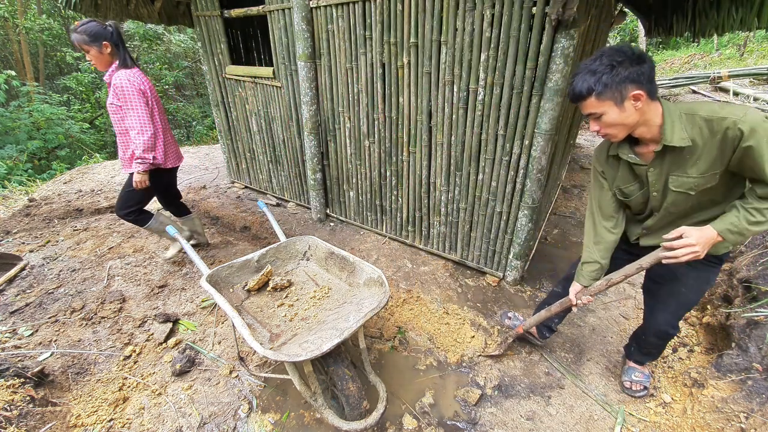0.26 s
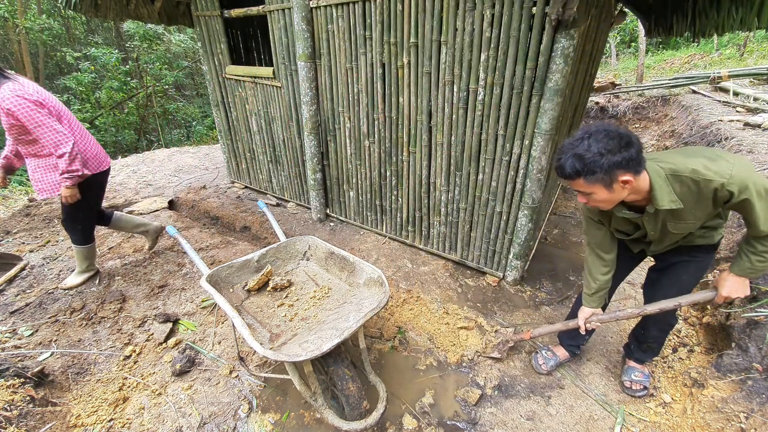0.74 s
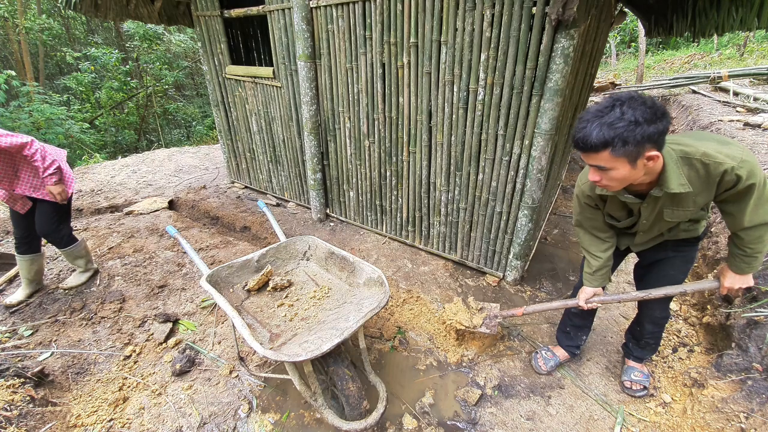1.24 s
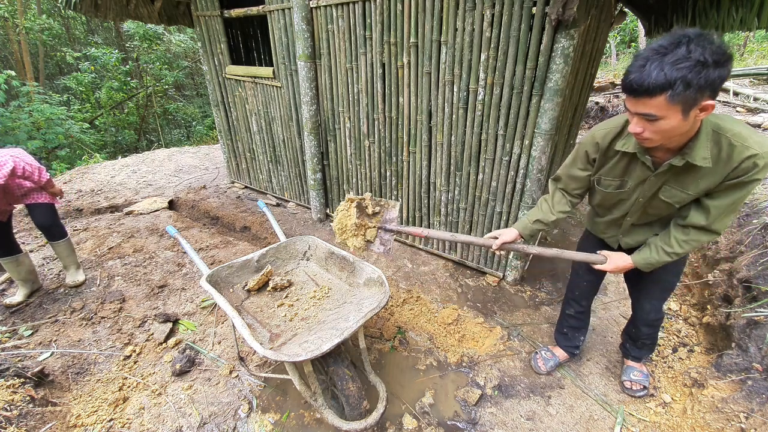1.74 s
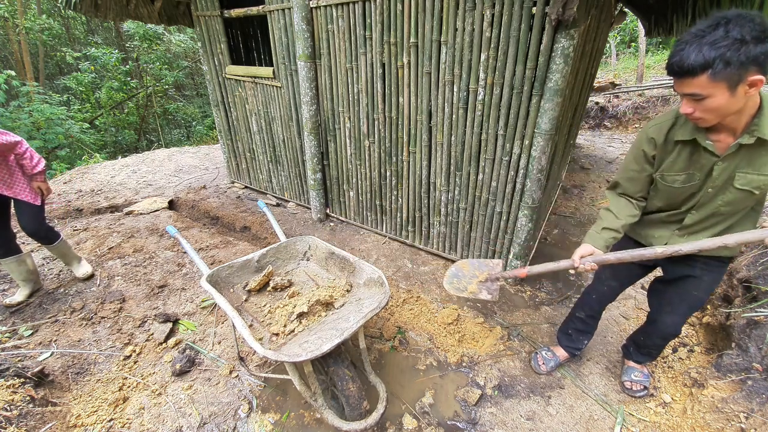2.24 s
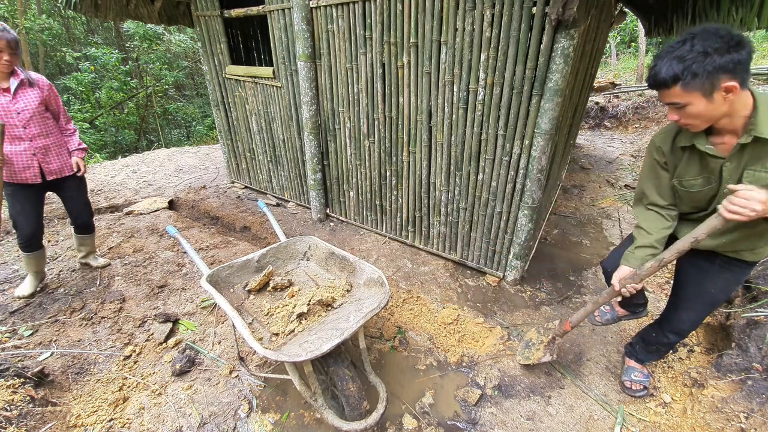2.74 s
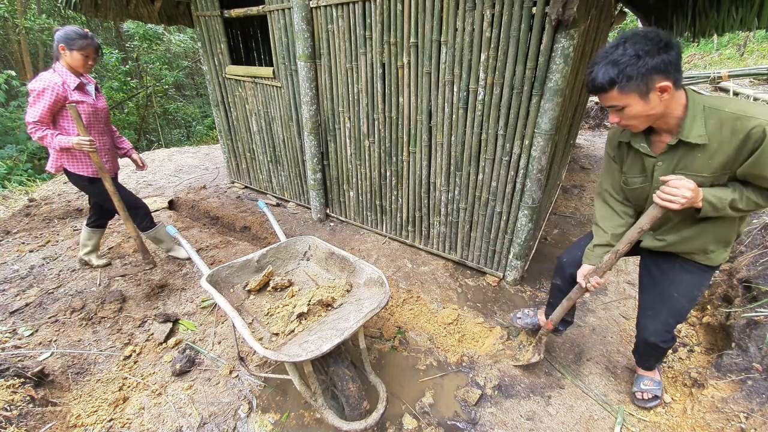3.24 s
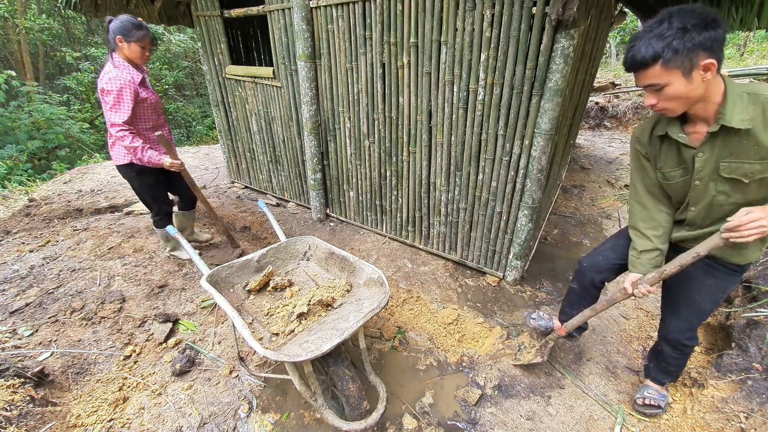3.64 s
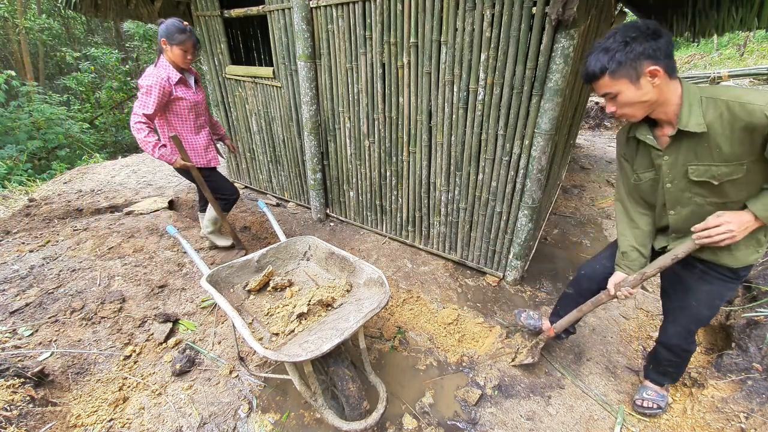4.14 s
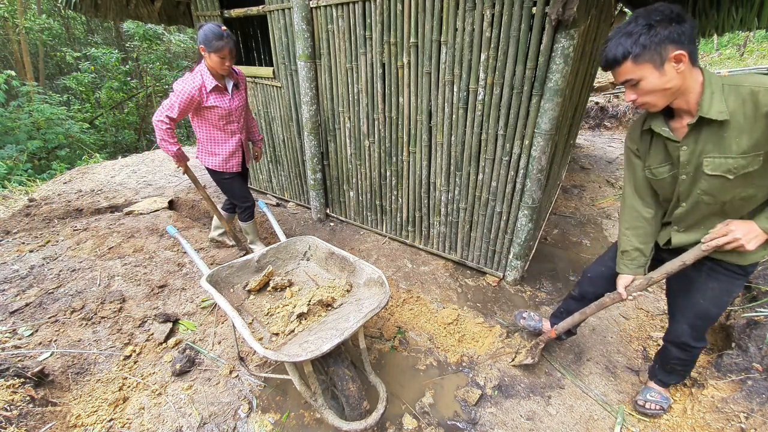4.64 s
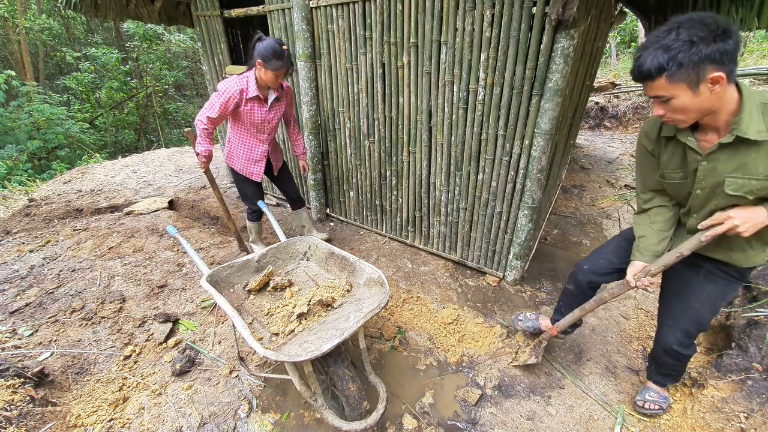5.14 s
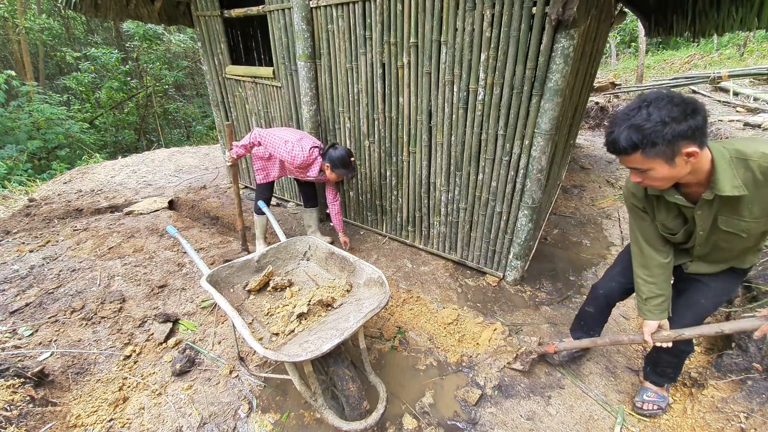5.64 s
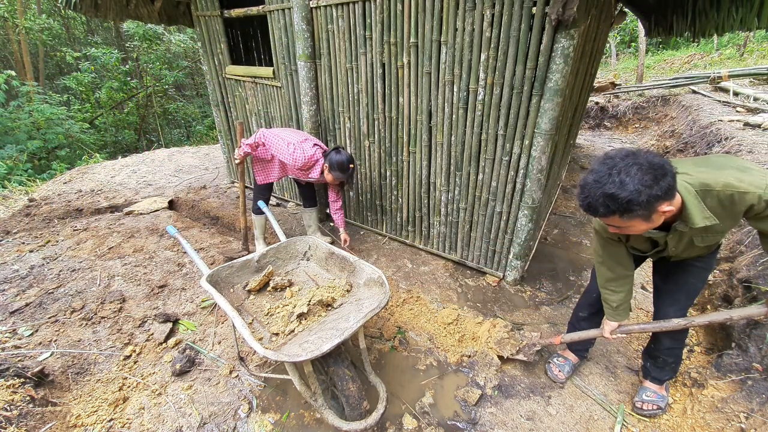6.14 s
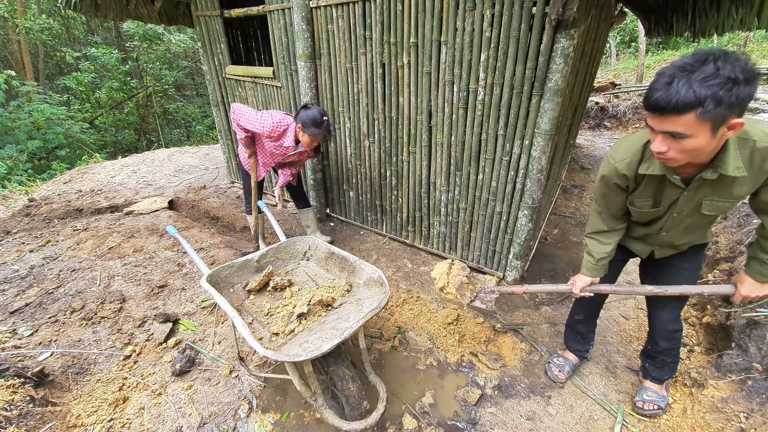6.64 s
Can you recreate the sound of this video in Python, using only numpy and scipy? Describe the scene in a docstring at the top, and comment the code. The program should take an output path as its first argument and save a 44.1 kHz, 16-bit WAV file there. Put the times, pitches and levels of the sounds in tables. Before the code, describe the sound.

A shovel bites into wet, gritty ground beside a hut, its blade ringing briefly against stones while boots shuffle softly. Near two seconds clods bang into the metal barrow, by far the loudest event, booming and scattering. Then come renewed scraping and sharp blade knocks, strongest around four and just past five seconds, before calm. Open-air stereo pickup at close range, with quiet cicadas and distant forest noise.

```python
"""Shovel and wheelbarrow by a bamboo hut

A steel shovel cuts and scrapes damp soil and boots crunch: shaped grain noise, with damped rings for knocks.
One load of clods drops into a sheet-metal wheelbarrow that booms; later come a faint hum and a faint bump:
noise rings its modes. Throbbing overtones make the cicadas, shaped noise the forest; two microphone ports."""
import sys
import numpy as np
from scipy import signal
from scipy.fft import rfft, irfft, next_fast_len
from scipy.io import wavfile
from scipy.ndimage import map_coordinates

SR = 44100
rng = np.random.default_rng(int(sys.argv[2]) if len(sys.argv) > 2 else 0)


def unload_audio(sound):
    """Save the sound as a 16-bit wav file, at the path given as the first command line argument."""
    columns = np.transpose(np.atleast_2d(sound))
    # keep every value between -1 and 1, then stretch to whole-number steps
    steps = np.round(np.clip(columns, -1, 1) * 32767)
    wavfile.write(sys.argv[1], SR, steps.astype(np.int16))


N = 303408


def amp(db):
    """dB to gain."""
    return 10 ** (np.asarray(db) / 20)


def unit(x):
    """Scaled to rms 1."""
    return x / np.sqrt(np.mean(x ** 2) + 1e-20)


def peaked(x):
    """Scaled to peak 1."""
    return x / np.abs(x).max()


def along(points, hz):
    """Values between (Hz, dB) points on a log frequency axis, -120 dB outside them."""
    point_hz, value = np.transpose(points)
    return np.interp(np.log(hz + 1), np.log(point_hz + 1), value, -120, -120)


def curves(rows):
    """One value per sample for each column; the first is -120 dB outside the rows."""
    time_s, level_db, *others = np.transpose(rows)
    t = np.arange(N) / SR
    return [np.interp(t, time_s, level_db, -120, -120)] + [np.interp(t, time_s, c) for c in others]


def wobble(rate):
    """A smooth random curve, rate knots a second."""
    knots = rng.standard_normal(int(N * rate / SR) + 4)
    return map_coordinates(knots, [np.arange(N) * rate / SR])


def swell(peak_s, rise_s, hold_s, fall_s):
    """Gain that climbs 20 dB in rise_s up to peak_s, holds, then loses 20 dB every fall_s."""
    t = np.arange(N) / SR - peak_s
    before = np.maximum(-t, 0) / max(rise_s, 1e-3)
    after = np.maximum(t - hold_s, 0) / max(fall_s, 1e-3)
    return amp(-20 * (before + after))


def filtered(x, response):
    """x times a complex response of frequency."""
    size = next_fast_len(x.shape[-1] + SR // 2)
    spectrum = rfft(x, size) * response(np.fft.rfftfreq(size, 1 / SR))
    return irfft(spectrum, size)[..., :x.shape[-1]]


def coloured(x, spectrum):
    """x shaped to a spectrum, rms 1."""
    return unit(filtered(x, lambda hz: amp(along(spectrum, hz))))


def resonances(modes):
    """Causal response of (Hz, width Hz, dB) resonances with alternating signs."""
    def response(f):
        total = 0
        for k, (mode_hz, width_hz, db) in enumerate(modes):
            damping = 1j * f * width_hz
            total = total + (-1) ** k * amp(db) * damping / (mode_hz ** 2 - f * f + damping)
        return total
    return response


def sides(pan_db):
    """Left and right gains, pan_db apart; negative leans right."""
    return amp(np.array([[.5], [-.5]]) * pan_db)


def late_left(x, lag_s):
    """Left port hears the source lag_s later than the right; negative means earlier."""
    return filtered(x, lambda hz: np.exp(-1j * np.pi * hz * lag_s * np.array([[1], [-1]])))


def crunch(grain_db, clump_db, snap_db, apart):
    """Breaking grains, uneven by grain and clump, with single snaps; the treble differs between ports."""
    snaps = (rng.random(N) < 400 / SR) * rng.standard_normal(N) * amp(snap_db)  # some 400 a second
    both, other = rng.standard_normal((2, N)) * amp(grain_db * wobble(900))
    other = filtered(other, lambda hz: apart / (1 + (900 / (hz + 1)) ** 2))
    return unit(amp(clump_db * wobble(45)) * (both + snaps + np.array([other, -other])))


def cicadas():
    """A buzzy drone: overtones throb about twelve times a second under rapid clicks, each wavering alone."""
    # overtones before trim and throb: multiple, level_db
    overtones = [(1, -68.5), (2, -70), (3, -71.5), (4, -74.5), (5, -79.5)]
    # slow swelling of the drone, used relative to its mean: time_s, level_db
    drone = [(0, -72.5), (1.6, -70.5), (2, -69.5), (2.5, -76), (3.2, -78), (4, -69.5), (5.199, -71),
             (6.2, -74.5), (6.88, -70)]
    pitch_hz, tymbal_hz = 1401, 236
    t = np.arange(N) / SR
    drone_gain = amp(curves(drone)[0] - np.mean(np.transpose(drone)[1]))
    clicks = 1 + .5 * np.cos(2 * np.pi * tymbal_hz * t + 1.8 * wobble(26))  # weak lines beside each overtone
    out = np.zeros((2, N))
    for k, db in overtones:
        throb = 1 + 0.4 * np.sin(2 * np.pi * 12.0 * t + 2.6 * wobble(3.3))
        for side in out:
            phase = 2 * np.pi * k * pitch_hz * t + .55 * k ** .3 * wobble(16)
            side += amp(db + 1.5 + 2 * wobble(23)) * throb * clicks * np.sin(phase)
    return out * drone_gain


def forest():
    """Far insects and leaves as shaped noise, with a low rumble that both ports share."""
    # forest noise before scaling to rms 1: freq_hz, relative level_db per Hz
    spectrum = [(18, -34), (30, -5), (71, -6), (232, -20.5), (931, -20.5), (1420, -1), (1750, -24.5),
                (2800, -6), (3450, -19), (4260, -7.5), (4730, -16.5), (5680, -9.5), (7990, -22),
                (10100, -22), (15800, -24)]
    left, right = (coloured(rng.standard_normal(N), spectrum) for side in range(2))
    right = right + filtered(left - right, lambda hz: 1 / (1 + (hz / 500) ** 2))
    return amp(-61 + 1.2 * wobble(1.2)) * np.array([left, right])


def digging():
    """One stream of breaking grains is heard as grit, sand and blade; low noise gives the ground thump."""
    # shovel blade resonances: freq_hz, width_hz, level_db
    blade_modes = [(345.4, 85, -3.5), (436, 90, -1), (558, 120, -0.5), (746, 285, -1), (1008, 377, -3.5),
                   (1246, 71, 0.5)]
    # coarse grit, fine sand and ground thump, each before scaling to rms 1: freq_hz, level_db per Hz
    grit_spectrum = [(900, -24), (1500, 2), (3000, 3.5), (4500, 0), (6000, -14.5), (8000, -58.5)]
    sand_spectrum = [(4500, -22), (6000, -6.5), (8000, -5.5), (10000, -3), (13000, -7.5), (15500, -13.5)]
    thump_spectrum = [(25, -43), (50, 1.5), (90, 1.5), (150, -5.5), (220, -4), (330, -23.5)]
    # scrapes and crunches under blade and boots, before layer trims:
    # peak_s, grit_db, rise_s, hold_s, fall_s, then re grit: sand_db, body_db, thump_db
    scrapes = [(0.068, -52.5, 0.076, 0, 0.096, -4, -3, -3), (0.188, -28.5, 0.034, 0, .03, -5, 1.5, -9),
               (0.215, -45.5, .02, 0, 0.14, -2.5, 5, 3),
               (0.562, -43.5, 0.007, 0.0021, 0.055, -4, 11.5, 10.5),
               (0.81, -53, 0.055, 0.045, .05, -2, 0, -4), (0.875, -42, .04, 0, .02, -7, -4, -27),
               (0.883, -34.5, 0.005, 0.0047, 0.045, -16, 5, -32),
               (0.928, -40, 0.056, 0.0063, 0.031, -4, -0.5, -23),
               (1.305, -43.5, .003, 0.021, 0.038, -16, 1, -32),
               (2.857, -34, 0.0044, 0.0043, 0.013, -3, -10.5, 2.5),
               (2.876, -51.5, 0.022, 0, 0.063, -1, -6, 13), (3.234, -55, .02, 0.0025, .06, -3, -15, -15),
               (3.296, -38, .035, 0.037, .05, -1, 1, -9), (3.347, -29.5, 0.055, 0, 0.031, -2, -5.5, -10),
               (3.406, -42.5, 0.065, 0.0064, 0.082, -5.5, -2, -5),
               (3.463, -48.5, 0.0049, 0, 0.021, 3.5, 5, -16),
               (3.475, -38, 0.0036, 0, 0.053, -11.5, -1.5, -16),
               (3.881, -40, 0.048, .025, 0.043, -1, -6, -20), (3.941, -26, .002, 0.003, 0.087, 1, -5, -24),
               (3.962, -23, 0.026, 0, .04, -8, -3, -1.5), (3.995, -30, 0.046, 0.00054, 0.049, -2.5, 4, -15),
               (4.05, -38.5, 0.29, 0, 0.042, -6.5, 3, 1), (4.158, -48, 0.023, 0, 0.07, -14.5, -6, -21),
               (4.282, -53.5, 0.17, 0.05, 0.16, -4.5, -2, -15),
               (4.562, -45, 0.033, 0.042, 0.045, -3.5, -0.5, -10),
               (4.676, -50, .005, 0.0011, 0.057, -5, 1, -20),
               (4.702, -39.5, 0.0037, 0.0017, 0.035, -12, -0.5, -23),
               (4.74, -36.5, .005, 0.0053, 0.037, -12, 10, -26),
               (5.116, -57.5, 0.053, 0, .08, -4, 3.5, -32), (5.18, -50.5, .06, 0.048, .05, -3.5, -18, -26),
               (5.264, -26.5, 0.012, 0, 0.089, -1.5, -15, -30),
               (5.282, -20, 0.023, 0, 0.054, -6, -2.5, -20),
               (5.324, -27.5, 0.077, 0.022, 0.028, -7, 4.5, -1),
               (5.389, -24.5, 0.0025, 0.0019, 0.029, -12.5, -0.5, -4), (5.41, -52, .02, 0, .12, -7, 9, 2),
               (5.53, -53, 0.05, 0.031, .2, -11, -9.5, -22), (5.839, -49, 0.064, 0, 0.17, 2, -6, -23),
               (5.948, -52.5, 0.33, 0, 0.17, -4, -2.5, -15),
               (6.388, -57.5, 0.11, 0.028, 0.094, -3.5, -25, -26.5)]
    # faint shuffling of feet and crumbs, before layer trims: time_s, grit_db, body_db re grit
    shuffle = [(0, -64.5, 5.5), (.3, -55, -16), (.5, -67, 0), (.65, -61, 1), (1.05, -62, -6),
               (1.27, -70, -14), (1.4, -63, -17), (2.6, -78.5, 0.5), (2.82, -65, -18), (3, -86, -10.5),
               (3.62, -59, -8), (3.78, -77, -19), (4.2, -63.5, -5.5), (4.81, -57, 1.5), (5.05, -67, -10),
               (5.45, -60, 3), (6.1, -66.5, -10), (6.5, -66.5, -18), (6.88, -69, -8)]

    grains = crunch(grain_db=1.0, clump_db=3.0, snap_db=12.5, apart=0.8)
    grit, sand = coloured(grains, grit_spectrum), coloured(grains, sand_spectrum)
    blade = unit(filtered(grains, resonances(blade_modes)))
    thump = coloured(rng.standard_normal(N), thump_spectrum)

    power = np.zeros((4, N))
    for peak_s, db, rise_s, hold_s, fall_s, *shares_db in scrapes:
        layer_gains = amp(db + np.array([0, *shares_db]))[:, None]
        power += (layer_gains * swell(peak_s, rise_s, hold_s, fall_s)) ** 2

    shuffle_db, body_db = curves(shuffle)
    faint_gains = [amp(shuffle_db + 1.5 * wobble(14) + db) for db in (0, -6.5, body_db, -9.5)]
    scrape_sides, shuffle_sides = sides(-2.5), sides(-6)
    trims_db = [2.5, 2.5, -2.0, -4]
    out = np.zeros((2, N))
    for layer, loud, faint, db in zip((grit, sand, blade, thump), np.sqrt(power), faint_gains, trims_db):
        out += amp(db) * layer * np.hypot(loud * scrape_sides, faint * shuffle_sides)
    return out


def wall(x):
    """Hut and ground answer briefly with decaying noise that differs between ports above the bass."""
    # decay of hut and ground: freq_hz, t60_s
    decay = [(150, 0.1), (1000, 0.084), (4000, 0.042), (12000, 0.075)]
    hz, t, z = signal.stft(rng.standard_normal((2, SR // 4)), SR, nperseg=256)
    z[1] += (z[0] - z[1]) / (1 + (hz[:, None] / 600) ** 2)
    t60_s = np.interp(hz, *np.transpose(decay))[:, None]
    tail = signal.istft(z * amp(-60 * t / t60_s), SR, nperseg=256)[1]
    delayed = np.pad(x, ((0, 0), (130, 0)))  # 130 samples, about 3 ms
    return signal.fftconvolve(delayed, tail / np.linalg.norm(tail[0]), axes=1)[:, :N]


def knocks():
    """Stones and boot on the blade: a crack with sprayed grit, a short damped ring, a low ground push."""
    # contacts before layer trims: start_s, ring_db, then re ring: clack_db, crack_db, thump_db; ring_hz
    contacts = [(0.172, -32.5, -10, -10.5, -22, 720), (0.199, -22.5, -11, -20.5, -4.5, 750),
                (0.357, -52, 15, 3.5, -31.5, 818), (0.561, -27, -10, -20.5, -13, 715),
                (0.805, -46.5, -4, -7, -7, 760), (0.881, -20.5, -6, -26.5, -43, 1025),
                (1.304, -26, -1, -8, -44, 1150), (1.325, -29, 4, -19.5, -44, 1150),
                (2.856, -38.5, 4.5, 3.5, -5.5, 330), (3.181, -48, 5, 1.5, -14, 570),
                (3.296, -38, -11, -18, -13, 374), (3.344, -28, 0.5, -6, -28, 680),
                (3.402, -34.5, -8, -11, -21, 427), (3.463, -36, -9, -3, -27, 748),
                (3.474, -34.5, 7, -7, -24, 670), (3.545, -45, -12, -5, -16, 774),
                (3.94, -26, 8, -1.5, -24, 420), (3.96, -15.5, -6, -1.5, -20, 700),
                (4.027, -20.5, -10, -20, -18, 610), (4.157, -55, 4, -5.5, -22, 1260),
                (4.182, -40, -9, -15, -33, 1050), (4.218, -44.5, -7, -7, -28, 721),
                (4.254, -42.5, -4, -6, -26, 1150), (4.302, -34, -15, -14.5, -22, 520),
                (4.56, -35, -3, -9.5, -15, 453), (4.675, -42, 3, 2.5, -20, 1130),
                (4.7, -22.5, -9, -17, -51, 690), (4.739, -17.5, -6.5, -26.5, -46, 1170),
                (5.264, -25, -4.5, -2.5, -32, 714), (5.277, -15, -1, -2.5, -30, 670),
                (5.389, -16, -1.5, -7, -27, 340), (5.521, -54, 10, -2.5, -17, 789),
                (5.559, -42.5, 6, -9, -27, 716), (5.621, -46, -10, -14.5, -31.5, 710),
                (5.829, -49, 0, 2.5, -17, 1296), (5.953, -41.5, -9, -7.5, -31, 406)]
    out, t = np.zeros((2, N + SR)), np.arange(SR // 4) / SR
    burst, after = amp(-60 * t / 0.0059), amp(-60 * t / 0.054)  # t60 in s
    crack_path = resonances([(5465, 4100, 1.5), (10500, 3100, -5)])
    clack_path = resonances([(1780, 790, 1.5), (2960, 1300, -3.5)])
    push = np.sin(2 * np.pi * 105 * t) * amp(-60 * t / 0.05) * (1 - np.exp(-t / .005))
    for start_s, db, clack_db, crack_db, thump_db, ring_hz in contacts:
        envelopes = burst + np.array([[.2], [.35]]) * after
        spray, shake = rng.standard_normal((2, len(t))) * envelopes
        hit = peaked(filtered(shake, resonances([(ring_hz, 120, 0), (1.86 * ring_hz, 400, -7)])))
        hit += amp(clack_db + 3.0) * peaked(filtered(spray, clack_path))
        hit += amp(crack_db + 8.5) * peaked(filtered(spray, crack_path))
        hit += amp(thump_db) * peaked(push)
        out[:, round(start_s * SR):][:, :len(t)] += amp(db + 2.0) * sides(-4) * hit
    return out[:, :N]


def tray_paths(clang_hz):
    """Clang, boom and rattle ring tray modes near the spot's pitch, low and high; the last path only hisses."""
    # the tray, damped by its load: freq_hz, width_hz, level_db
    tray = [(92.4, 51, -7), (146.4, 13, -1), (196.8, 16.3, 7), (265, 22, -3.5), (284, 29, -3.5),
            (340.5, 27, 0), (406, 21, -0.5), (446.6, 22, -1.5), (480, 25, -5), (545.4, 12, 3),
            (593.3, 16.8, 3.5), (632.5, 34, -1.5), (684, 50, -4.5), (779, 27.9, -5), (823, 30, -5),
            (876, 51, 1), (999, 31, -1), (1165, 40, -6.5), (1300, 60, -6.5), (1493.5, 100, -12),
            (1677, 83, -12), (1840, 65, -11.5), (1918, 120, -15), (2250, 66, -16), (1035, 58, -13.5),
            (2480, 120, -17), (2890, 150, -20.5), (3400, 370, -24.5)]
    # slap and fine hiss on the sheet: freq_hz, relative level_db per Hz
    hiss = [(2000, -25.5), (3200, 5), (4000, -0.5), (7000, -9), (10000, -6.5), (15500, -16)]
    sheet = resonances(tray)
    spot = resonances([(clang_hz, 0.36 * clang_hz, 0)])

    def band(low_hz, high_hz):
        """Sheet modes kept between two soft cutoffs."""
        return lambda f: sheet(f) * (1j * f / low_hz / (1 + 1j * f / low_hz) / (1 + 1j * f / high_hz)) ** 2

    clang = lambda f: sheet(f) * spot(f)
    return clang, band(110, 280), band(1300, 5600), lambda f: amp(along(hiss, f))


def barrow():
    """Each clod or bump strikes, then crumbles on the sheet; longer swells of grain noise use the same paths."""
    # clods and bumps on the tray, before path trims:
    # start_s, clang_db, then re clang: boom_db, rattle_db, slap_db; clang_hz, crumble t60_s
    clods = [(1.957, -2, -2.5, -2, -26.5, 716, 0.11), (1.974, -12.5, 5, -9, -24.5, 332, 0.14),
             (2.009, -7.5, 0.5, -1, -18.5, 326, 0.096), (2.071, -3.5, -18, -16.5, -18, 614, 0.049),
             (2.107, -11.5, 2, -19, -16, 317, 0.034), (2.129, -12.5, -7, -2.5, 0, 309.5, 0.054),
             (2.18, -1, -31, -4, -32, 593, 0.053), (2.209, -11.5, -24, -6.5, -33, 603, 0.049),
             (2.224, -15.5, -20, -12, -31, 568, 0.037), (2.244, -20, -23, -22.5, -31.5, 587, 0.036),
             (2.283, -23.5, -29, -23, -25, 573, 0.052), (2.319, -32.5, -9, -2, -22, 570, 0.049),
             (2.39, -46.5, 3, -7, -4, 400, 0.048), (2.419, -57, 1, 8, -20, 326, 0.049),
             (2.509, -35.5, -31, -12.5, -24.5, 396, 0.027), (6.596, -26, -17, 2, -14.5, 452, 0.033),
             (6.623, -32, -15, -10, -12.5, 380, 0.029), (6.644, -39.5, -27, -16, -13, 390, 0.03),
             (6.666, -48, 4, -10, -19, 332, 0.058), (6.689, -43, -10, -10, -12, 333, 0.04)]
    # loose soil sliding in the tray, then a faint hum as the tray is touched and the ring of a late bump,
    # before path trims: peak_s, clang_db, hold_s, fall_s, then re clang: boom_db, rattle_db, hiss_db; clang_hz
    swells = [(1.963, -17, 0.059, 0.13, 1, -4.5, -22, 457), (2.075, -17, 0, 0.13, -3.5, -10.5, -20, 560),
              (2.108, -27, 0.046, .08, 5, 1, -7, 400), (2.182, -15, 0.016, 0.059, -12, -4.5, -23, 560),
              (2.25, -31, 0.039, 0.095, 1.5, -11.5, -19.5, 559),
              (2.324, -41.5, 0.0081, 0.12, 5, -2, -12, 400), (5.72, -61, .25, .05, -14, -20, -25, 420),
              (6.599, -40, .02, 0.15, -6, -8, -11.5, 370)]
    out, t = np.zeros((2, N + SR)), np.arange(SR // 3) / SR
    port_spread = [0.024, 0.0062, 0.57, 1.0]  # a wide sheet sends each port its own treble
    for start_s, db, boom_db, rattle_db, slap_db, clang_hz, t60_s in clods:
        envelope = amp(-60 * t / t60_s) + 2.2 * amp(-60 * t / 0.007)
        both, other = rng.standard_normal((2, len(t))) * envelope
        shares_db = [-1.5, boom_db, rattle_db + 4.0, slap_db + 7.5]
        for path, share_db, apart in zip(tray_paths(clang_hz), shares_db, port_spread):
            crumble = both + apart * np.array([other, -other])
            strike = peaked(filtered(crumble, path))
            out[:, round(start_s * SR):][:, :len(t)] += amp(db + share_db) * strike

    grains = crunch(grain_db=2, clump_db=4.0, snap_db=14.0, apart=1.0)
    for peak_s, db, hold_s, fall_s, boom_db, rattle_db, hiss_db, clang_hz in swells:
        span = slice(round(peak_s * SR) - SR // 10, round(peak_s * SR) + SR)
        drive = grains[:, span]
        gain = swell(peak_s, .008, hold_s, fall_s)[span]
        shares_db = [-3, boom_db - 4, rattle_db + 0.5, hiss_db + 2.0]
        for path, share_db in zip(tray_paths(clang_hz), shares_db):
            steady = np.std(filtered(drive[0], path))  # each path is levelled by its unswelled sound
            out[:, :N][:, span] += filtered(amp(db + share_db) * gain * drive, path) / steady
    return out[:, :N] * sides(-2.3)


def scene():
    """Digger and barrow lean right, the barrow reaching the left port first; forest all round."""
    near = late_left(digging() + knocks(), lag_s=0.00019) + late_left(barrow(), lag_s=-0.000074)
    return amp(-1.0) * near + amp(-8) * wall(near) + cicadas() + forest()


def record(dry):
    """The ports lose the deepest bass, loud peaks round off softly, nothing is kept above the band limit."""
    bass_hz, top_hz = 40, 15900
    ports = filtered(dry, lambda hz: (1j * hz / bass_hz / (1 + 1j * hz / bass_hz)) ** 2)
    soft = ports / (1 + np.abs(ports) ** 6) ** (1 / 6)
    return filtered(soft, lambda hz: hz < top_hz)


dry = scene()
out = record(dry)
unload_audio(out)
```